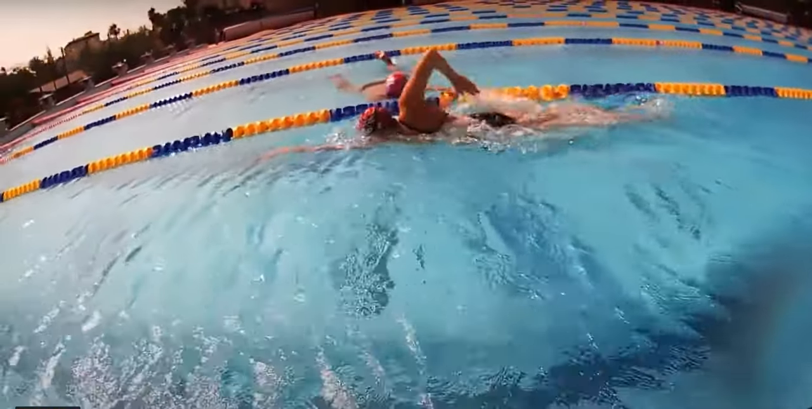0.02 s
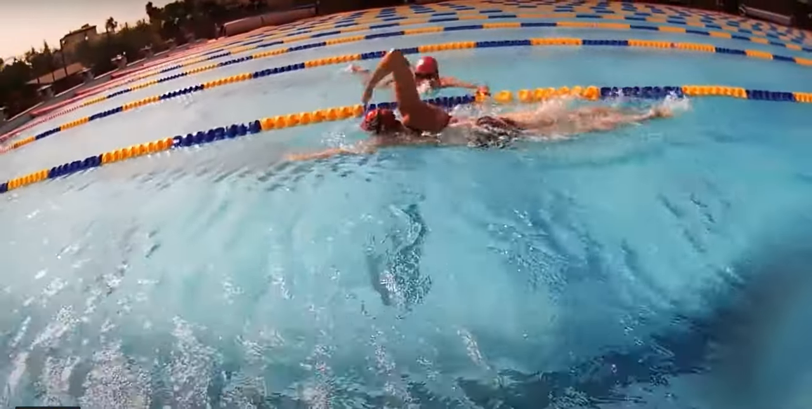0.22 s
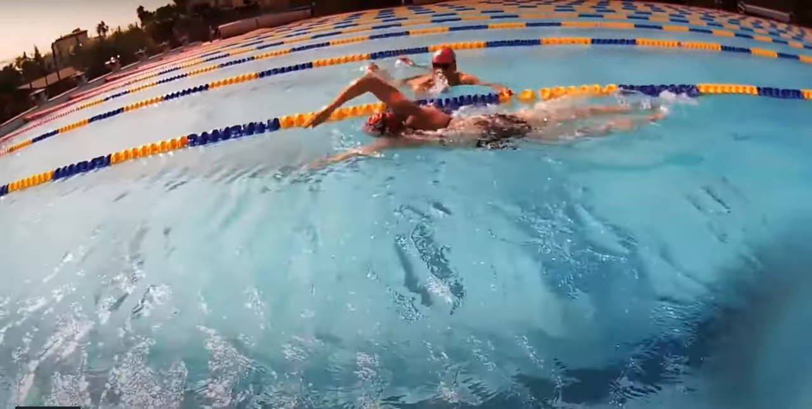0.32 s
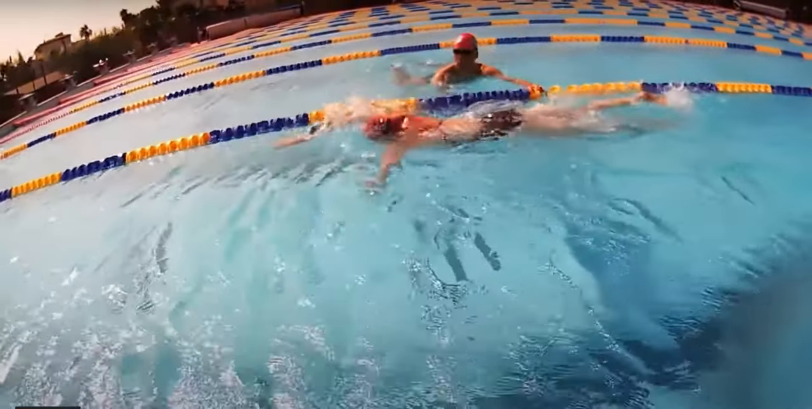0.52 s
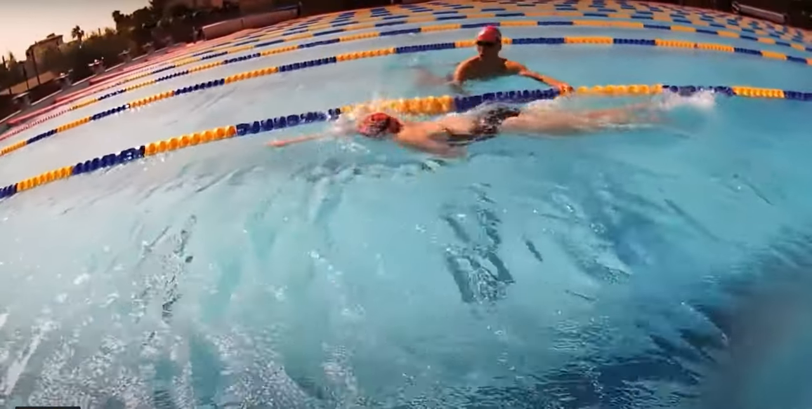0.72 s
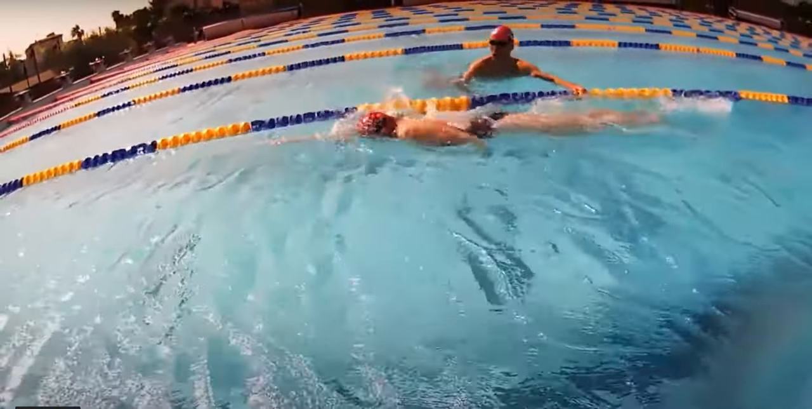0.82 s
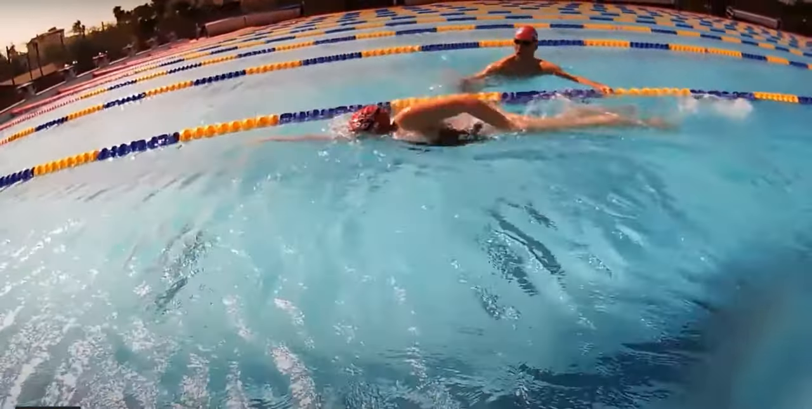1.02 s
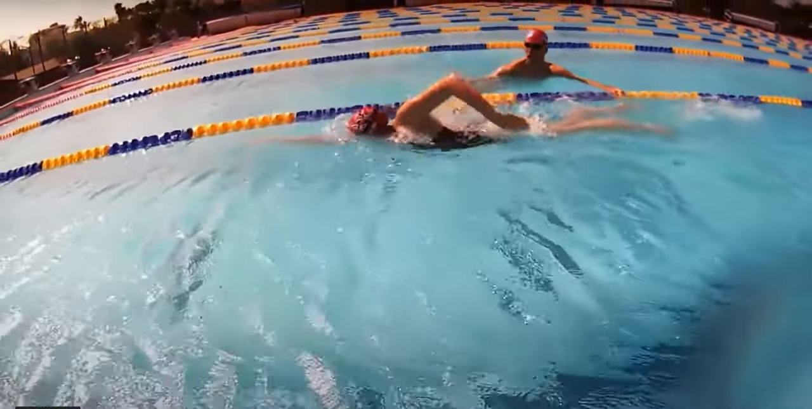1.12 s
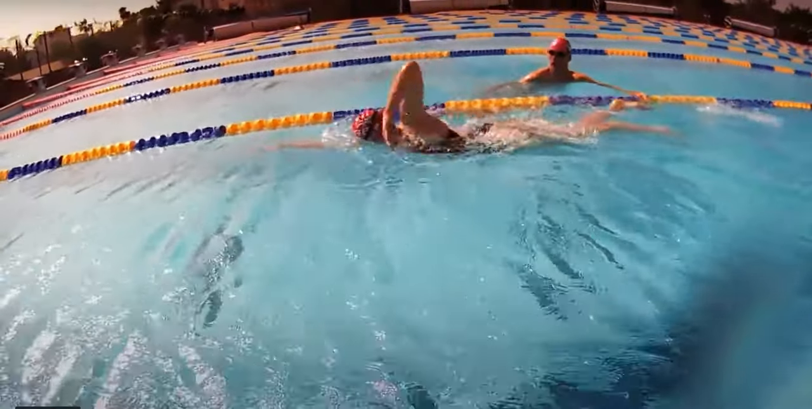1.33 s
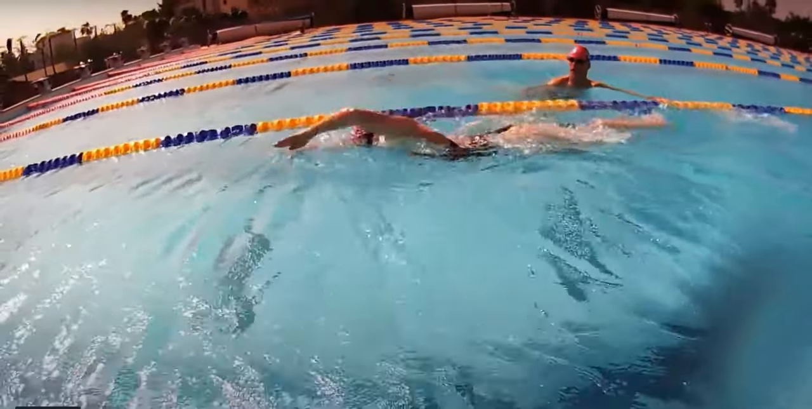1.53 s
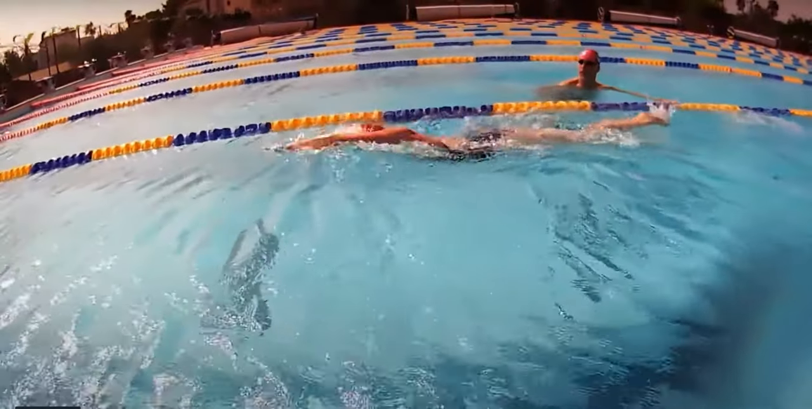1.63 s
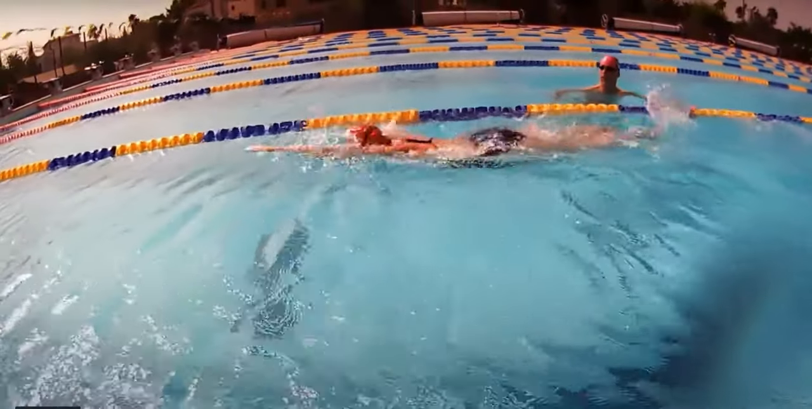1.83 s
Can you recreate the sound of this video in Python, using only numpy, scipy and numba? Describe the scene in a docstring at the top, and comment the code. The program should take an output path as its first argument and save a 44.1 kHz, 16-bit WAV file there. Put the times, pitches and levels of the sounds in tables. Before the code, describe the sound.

A swimmer's stroke in an outdoor pool: near quiet, then a sudden burst of sharp slaps and bubbling churn, fading to scattered plops, droplets and soft hiss, heard close through a boxy watertight camera case.

```python
"""Swimmer close to a cased microphone

At the edge of an outdoor pool a swimmer passes close to a small camera in a watertight case.
An arm slaps in and churns: bubble clouds, plops and slaps are short rings; spray is bursts of noise.
A softer lapping wash follows, of the same bubbles and filtered noise over a low slosh.
The case colours every source with its resonances; the recorder overloads a little on loud slaps."""
import sys
import numpy as np
from scipy import signal
from scipy.fft import rfft, irfft
from scipy.io import wavfile
from numba import njit

SR = 44100
rng = np.random.default_rng(int(sys.argv[2]) if len(sys.argv) > 2 else 0)


def wrap_up_sound(samples):
    """Save the sound to the file named by the first command line argument, as 16-bit audio."""
    columns = np.atleast_2d(samples).T
    # keep every value between -1 and 1, then stretch to whole-number steps
    tamed = np.clip(columns, -1, 1)
    steps = np.round(tamed * 32767).astype(np.int16)
    wavfile.write(sys.argv[1], SR, steps)


N = 83790


def undb(db):
    """Amplitude factor of a level in dB."""
    return 10 ** (np.asarray(db) / 20)


def unit(x):
    """Scale to rms 1."""
    return x / np.sqrt(np.mean(x ** 2))


def curve(table, column):
    """Draw one column as straight lines over the whole scene."""
    rows = np.array(table)
    return np.interp(np.arange(N) / SR, rows[:, 0], rows[:, column])


def case_db(hz):
    """Gain of the case in dB, interpolated over log frequency."""
    # resonances and dips of the watertight case: (f/Hz, level/dB)
    case_response = [(30, -42), (60, -14.5), (110, -12), (240, -2), (370, -4.5), (700, -1), (1010, 1),
                     (1280, -6), (1500, -2.5), (1830, -11.5), (2250, -2), (2650, -13.5), (3300, -16.5),
                     (4200, -30), (5000, -17), (5900, -11), (6500, -18.5), (7400, -5.5), (8000, -14),
                     (10500, -13)]
    f, level = np.array(case_response).T
    return np.interp(np.log(np.maximum(hz, 1)), np.log(f), level)


def case(x):
    """The case rings: a minimum-phase filter, so all its energy follows the sound that excites it."""
    size = 4096
    half = size // 2
    log_gain = case_db(np.arange(half + 1) * SR / size) * np.log(10) / 20
    # folding the cepstrum onto positive time gives the minimum phase
    cepstrum = irfft(log_gain)
    cepstrum[1:half] *= 2
    cepstrum[half + 1:] = 0
    ringing = irfft(np.exp(rfft(cepstrum)))[:half]
    return signal.fftconvolve(x, ringing)[:N]


def band(x, hz, octaves):
    """Keep the band reaching the given octaves to either side of hz."""
    edges = np.clip(hz * 2. ** np.array([-octaves, octaves]), 20, SR / 2.2)
    return signal.sosfilt(signal.butter(2, edges, "bandpass", fs=SR, output="sos"), x)


@njit
def bubbles(n, start, step, cycles, size, rise):
    """Each bubble swells, rings a few cycles while its pitch climbs by the rise (if any), and dies."""
    out = np.zeros(n)
    for k in range(len(start)):
        phase, i = 0., int(start[k])  # phase in cycles, i in samples
        while phase < 3 * cycles[k] and i < n:
            u = 3 * phase / cycles[k]
            swell = u * np.exp(1 - u)  # peaks at 1 when u = 1
            out[i] += size[k] * swell * np.sin(2 * np.pi * phase)
            phase += step[k] * (1 + rise * phase)
            i += 1
    return out


def cloud(count, hz, octaves, cycles, scatter_db, rise, wash_db):
    """Bubbles of random onset, pitch, length and size over a smooth noise wash, heard through the case; rms 1."""
    start = rng.random(count) * N
    pitch_bell, length_bell, size_bell = np.clip(rng.standard_normal((3, count)), -2, 2)
    pitch = np.minimum(hz * 2 ** (octaves * pitch_bell), SR / 5)
    lengths = cycles * 1.6 ** length_bell
    sizes = undb(scatter_db * size_bell)
    pops = bubbles(N, start, pitch / SR, lengths, sizes, rise)
    wash = band(rng.standard_normal(N), hz, 1.39 * octaves)
    return unit(case(unit(pops) + undb(wash_db) * unit(wash)))


def churn():
    """Three sizes of bubble follow the stroke, bigger ones ringing lower; a mist of tiny ones hisses on."""
    # how hard the water churns: (t/s, big bubbles level/dB, middle bubbles level/dB, small bubbles level/dB)
    churn_levels = [(0.0, -40, -38, -39), (0.01, -37, -37, -37.5), (0.104, -51, -36.5, -37.5),
                    (0.132, -45, -44, -39), (0.184, -40, -36.5, -41.5), (0.2, -33, -41, -45),
                    (0.21, -29.5, -22, -26), (0.216, -28, -15.5, -27.5), (0.268, -33, -13, -20),
                    (0.284, -23, -31, -41), (0.296, -34, -12, -21.5), (0.312, -29, -30.5, -35.5),
                    (0.332, -29, -18, -30), (0.374, -27.5, -22.5, -38.5), (0.386, -27, -21, -22.5),
                    (0.412, -31.5, -17.5, -34.5), (0.428, -25, -29, -34), (0.448, -27.5, -16.5, -22),
                    (0.464, -30.5, -19.5, -39.5), (0.476, -22.5, -20, -28.5), (0.492, -32, -38, -38),
                    (0.544, -38, -35, -39), (0.566, -40, -41, -41.5), (0.608, -34, -36, -39),
                    (0.634, -36.5, -34.5, -43.5), (0.65, -36, -28.5, -31), (0.666, -30.5, -33, -34),
                    (0.734, -36.5, -38, -36), (0.772, -44, -38, -31.5), (0.814, -40, -47.5, -40),
                    (0.862, -47, -40.5, -37.5), (0.882, -43, -44.5, -44), (0.92, -38, -37, -37.5),
                    (1.026, -44.5, -49, -37), (1.11, -46, -39.5, -40.5), (1.168, -52, -49.5, -39),
                    (1.19, -36, -36, -37), (1.216, -44.5, -38.5, -33.5), (1.296, -67, -40.5, -35.5),
                    (1.322, -34.5, -38.5, -35.5), (1.344, -33.5, -27, -32.5), (1.36, -35.5, -35, -36.5),
                    (1.47, -60.5, -48.5, -39), (1.614, -52.5, -47, -37), (1.63, -50.5, -51.5, -36.5),
                    (1.66, -39.5, -42, -41.5), (1.688, -50, -49, -42.5), (1.762, -42.5, -38.5, -39),
                    (1.772, -37, -32, -24.5), (1.782, -38.5, -37, -36.5), (1.868, -62, -43.5, -38),
                    (1.9, -69, -34.5, -38.5)]
    # fine spray hiss: (t/s, level/dB)
    hiss_levels = [(0.0, -36), (0.11, -40.5), (0.538, -37.5), (0.888, -40), (1.21, -37), (1.566, -40.5),
                   (1.9, -38)]
    # octaves: pitch spread; rise: fraction of the starting pitch gained per cycle
    big = cloud(500, hz=333, octaves=0.83, cycles=4., scatter_db=0.5, rise=0.36, wash_db=-1)
    middle = cloud(900, hz=863, octaves=0.49, cycles=3.5, scatter_db=2, rise=0.21, wash_db=-2)
    small = cloud(2000, hz=1998.5, octaves=0.57, cycles=6.5, scatter_db=1.5, rise=0.43, wash_db=0.5)
    mist = cloud(6000, hz=6200, octaves=0.48, cycles=6.5, scatter_db=0.5, rise=0.0, wash_db=-5)
    out = undb(curve(churn_levels, 1)) * big
    out += undb(curve(churn_levels, 2)) * middle
    out += undb(curve(churn_levels, 3)) * small
    out += undb(curve(hiss_levels, 1)) * mist
    return out


def slosh():
    """Low slosh against the case: a narrow band of noise that swells and sinks."""
    # (t/s, level/dB)
    slosh_levels = [(0.0, -46), (0.132, -55), (0.164, -48.5), (0.46, -44), (0.576, -58), (0.592, -44),
                    (1.0, -52), (1.02, -57), (1.354, -52.5), (1.566, -69), (1.608, -52.5), (1.788, -51),
                    (1.836, -67), (1.9, -59)]
    rumble = band(rng.standard_normal(N), hz=120.5, octaves=0.49)
    return undb(curve(slosh_levels, 1)) * unit(case(rumble))


def plops():
    """Single large bubbles, each a short ring of climbing pitch."""
    # levels are those behind the case: (t/s, peak level/dB, starting pitch f/Hz, length/s)
    plop_list = [(0.034, -31.5, 990, 0.0059), (0.096, -26, 965, 0.0073), (0.21, -15, 1025, 0.011),
                 (0.226, -10, 822, 0.0061), (0.235, -6, 934, 0.0065), (0.241, -8, 1020, 0.0029),
                 (0.253, -12, 1050, 0.0065), (0.26, -12, 1044, 0.0065), (0.27, -14, 1150, 0.0046),
                 (0.294, -34, 760, 0.0029), (0.331, -11.5, 690, 0.0049), (0.382, -14, 496, 0.0077),
                 (0.393, -10, 634, 0.0032), (0.405, -13.5, 970, 0.0042), (0.421, -9, 821, 0.0052),
                 (0.436, -20, 1270, 0.0097), (0.448, -10, 1020, 0.0046), (0.459, -10, 753, 0.0039),
                 (0.474, -15, 666, 0.0046), (0.531, -23.5, 550, 0.0053), (0.604, -22, 575, 0.0042),
                 (0.645, -21, 603, 0.0065), (0.65, -26, 796, 0.0059), (0.668, -25, 630, 0.0059),
                 (0.69, -19, 630, 0.0058), (0.766, -33, 1150, 0.014), (0.861, -33.5, 2090, 0.005),
                 (0.919, -23.5, 725, 0.0069), (0.989, -30, 1000, 0.0075), (1.187, -26, 298, 0.0035),
                 (1.219, -25.5, 1426, 0.0065), (1.322, -24.5, 527, 0.0043), (1.33, -22.5, 1040, 0.0061),
                 (1.34, -22, 700, 0.0052), (1.343, -17, 640, 0.0051), (1.369, -31, 657, 0.0086),
                 (1.419, -28.5, 2140, 0.0047), (1.509, -26, 2300, 0.011), (1.552, -24, 1660, 0.0087),
                 (1.561, -25.5, 1500, 0.0065), (1.627, -35, 2090, 0.0073), (1.704, -31.5, 940, 0.0065),
                 (1.769, -19.5, 2236, 0.0044), (1.802, -23, 987, 0.006), (1.812, -25, 886, 0.006),
                 (1.889, -27, 1005, 0.0076)]
    rise_hz_per_s = 9500  # at the onset
    out = np.zeros(N)
    for start, db, hz, length in plop_list:
        cycles = max(hz * length, 1)
        size = undb(db - case_db(hz))  # undo the gain of the case at this pitch
        rise = rise_hz_per_s / hz ** 2
        out += bubbles(N, np.array([start * SR]), np.array([hz / SR]), np.array([float(cycles)]),
                       np.array([float(size)]), rise)
    return case(out)


def spray():
    """Flung drops: short bright bursts shaped from one band of noise."""
    # (t/s, level/dB of twice the burst's peak, length/s of twice its rise)
    drops = [(0.0566, -23.5, 0.0026), (0.213, -37, 0.0035), (0.2344, -27, 0.0024), (0.26, -23, 0.004),
             (0.262, -34, 0.0034), (0.297, -29, 0.0027), (0.3214, -20, 0.0034), (0.665, -26.5, 0.004),
             (0.735, -21, 0.0045), (0.7438, -19, 0.004), (0.7489, -15, 0.0056), (0.83, -24, 0.0036),
             (0.9138, -30, 0.0032), (0.9307, -26, 0.0042), (1.2565, -23, 0.0027), (1.277, -23.5, 0.0048),
             (1.31, -24, 0.0027), (1.562, -26.5, 0.0061), (1.649, -30.5, 0.0055), (1.7694, -31, 0.0054),
             (1.821, -30, 0.0029)]
    hz, width_hz = 6250, 3560
    t, shape = np.arange(N) / SR, np.zeros(N)
    for start, db, length in drops:
        u = np.maximum(t - start, 0) / max(length, 1e-4) * 2
        shape += undb(db) * u * np.exp(1 - u) / 2
    hiss = band(rng.standard_normal(N), hz, width_hz / hz / 2)
    return shape * unit(case(hiss))


def slaps():
    """Sharp slaps of water on water: cracks of two or three cycles at a steady pitch."""
    # levels are those behind the case: (t/s, peak level/dB, pitch f/Hz)
    slap_list = [(0.2111, -11, 1340), (0.2189, -7, 2230), (0.2347, -12, 1240), (0.2424, -0.5, 2320),
                 (0.253, -7, 2340), (0.257, -15, 1570), (0.2612, -9, 1600), (0.2707, -4.5, 1690),
                 (0.2943, -14.5, 1360), (0.2956, -20, 1580), (0.3287, -11, 1520), (0.344, -23, 1400),
                 (0.352, -19, 1400), (0.3614, -26, 1300), (0.3834, -7, 1390), (0.3923, -7, 1550),
                 (0.406, -7, 2270), (0.4198, -11, 1670), (0.435, -8, 1310), (0.4445, -10, 1460),
                 (0.4524, -22, 1500), (0.4684, -11.5, 1500), (0.475, -14, 1370), (0.6434, -28, 1420),
                 (0.6522, -10, 2030), (0.6714, -21, 2050), (0.766, -22.5, 1700), (0.9258, -22, 1460),
                 (0.9649, -21, 1360), (1.2187, -17.5, 1430), (1.3314, -30, 2290), (1.341, -19, 1410),
                 (1.343, -18.5, 1590), (1.7704, -17, 2250)]
    t, db, hz = np.array(slap_list, float).T
    cycles = np.full(len(t), 1.55)
    return case(bubbles(N, t * SR, hz / SR, cycles, undb(db - case_db(hz)), 0.))


def scene():
    """All the water together, on one channel."""
    return (churn() + slosh() + plops() + spray() + slaps())[None]


def record(dry):
    """Recorder: dulled ends, treble overload on loud peaks, faint self-noise and a steep top cut."""
    case_top_hz, bass_cut_hz, top_hz = 7970, 30, 15750
    leak_db, bend_db, crackle_db, self_noise_db = -26.5, -15, -34, -74.5
    dull = signal.sosfilt(signal.ellip(10, .5, 60, case_top_hz, fs=SR, output="sos"), dry)
    dull = dull + undb(leak_db) * dry  # a little treble leaks past the cut
    dull = signal.sosfilt(signal.butter(2, bass_cut_hz, "highpass", fs=SR, output="sos"), dull)
    # a squared copy and level-following noise, kept to the high treble
    bend = undb(bend_db) * dull ** 2
    crackle = undb(crackle_db) * np.abs(dull) ** 1.45 * rng.standard_normal(dry.shape)
    treble = signal.butter(2, case_top_hz, "highpass", fs=SR, output="sos")
    overload = signal.sosfilt(treble, bend + crackle)
    self_noise = undb(self_noise_db) * rng.standard_normal(dry.shape)
    steep_cut = signal.ellip(12, .2, 80, top_hz, fs=SR, output="sos")
    return signal.sosfilt(steep_cut, dull + overload + self_noise)


dry = scene()
out = record(dry)
wrap_up_sound(out)
```